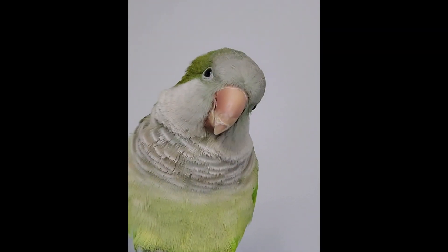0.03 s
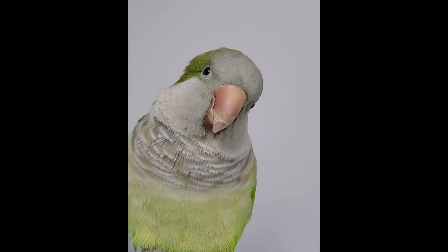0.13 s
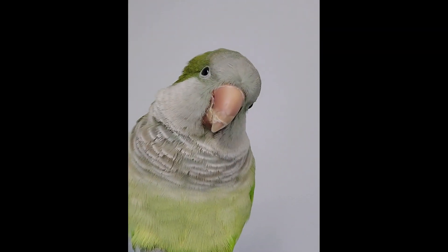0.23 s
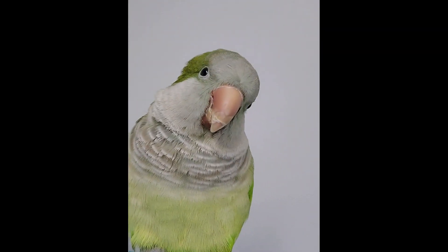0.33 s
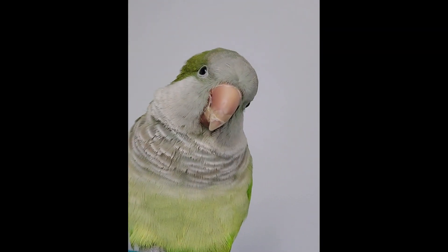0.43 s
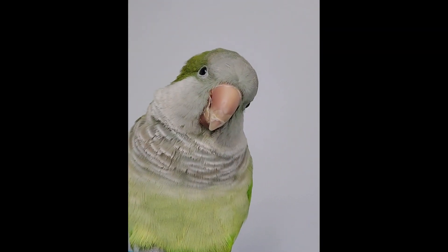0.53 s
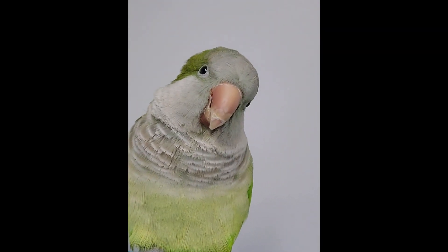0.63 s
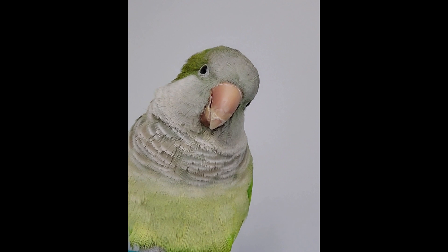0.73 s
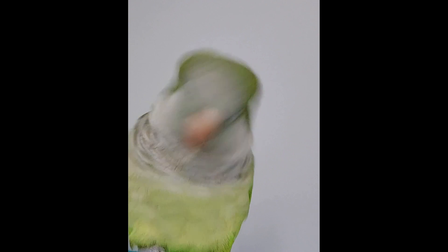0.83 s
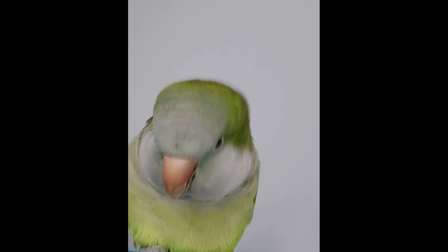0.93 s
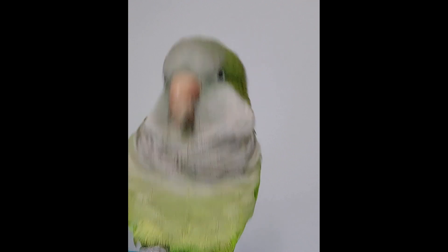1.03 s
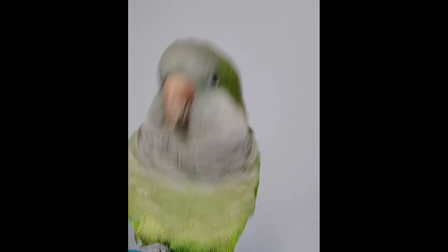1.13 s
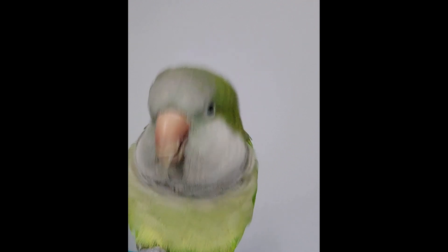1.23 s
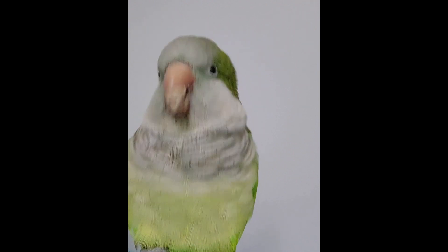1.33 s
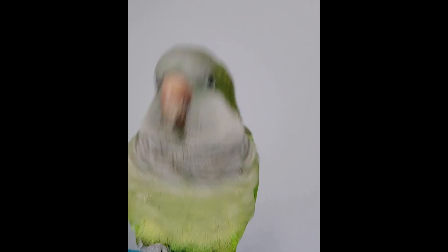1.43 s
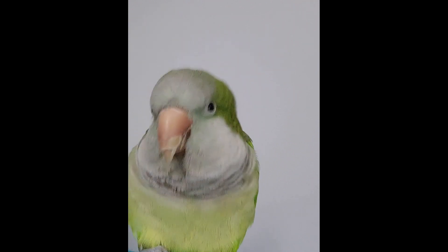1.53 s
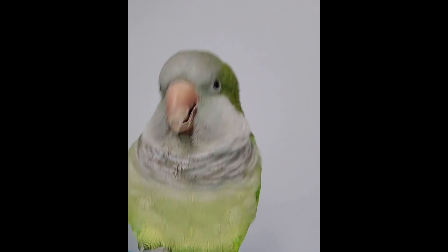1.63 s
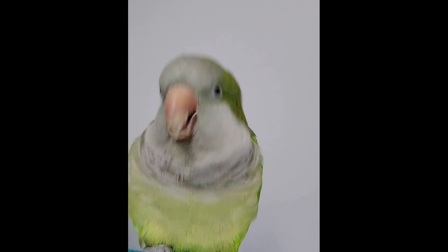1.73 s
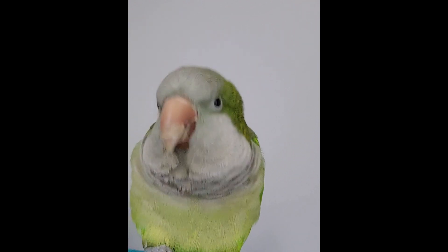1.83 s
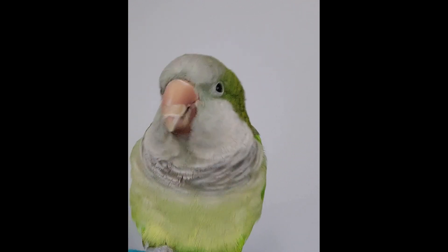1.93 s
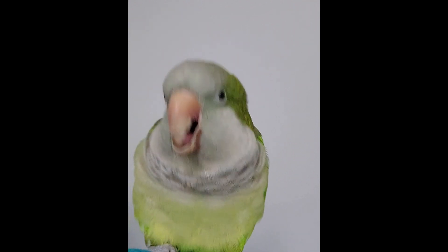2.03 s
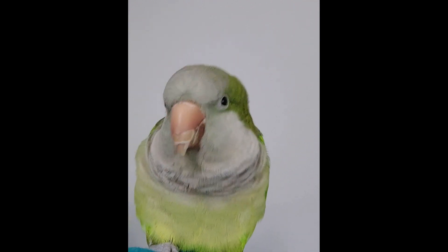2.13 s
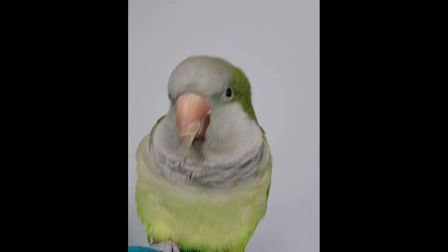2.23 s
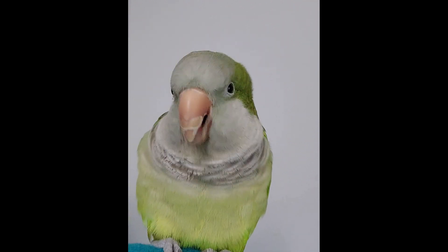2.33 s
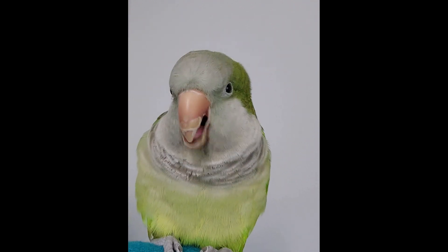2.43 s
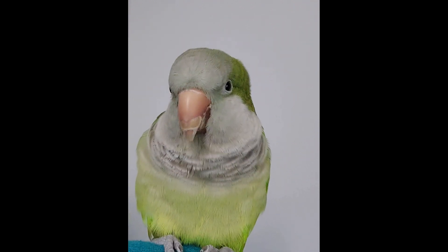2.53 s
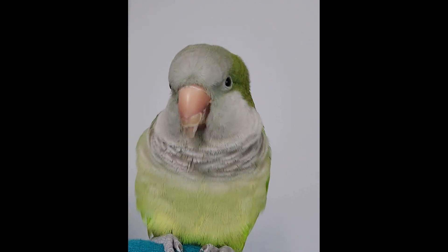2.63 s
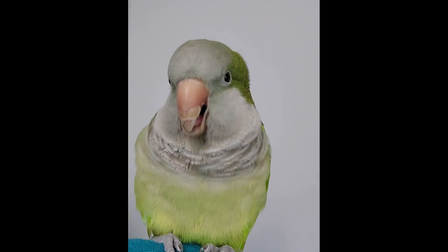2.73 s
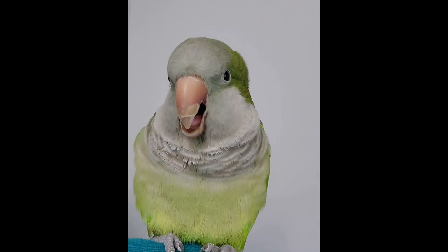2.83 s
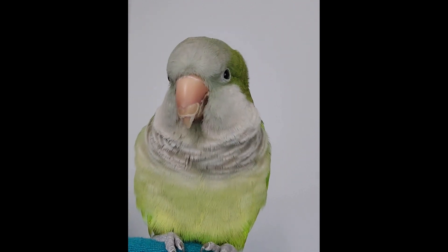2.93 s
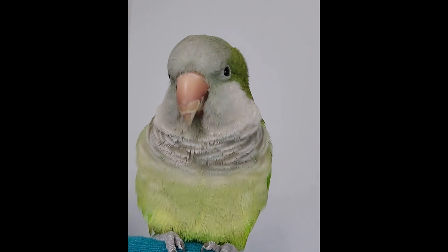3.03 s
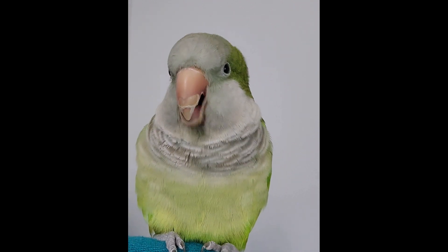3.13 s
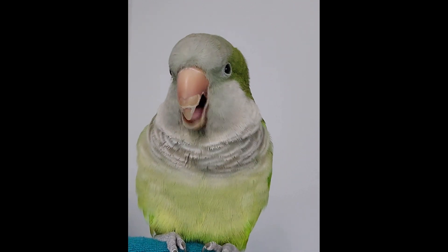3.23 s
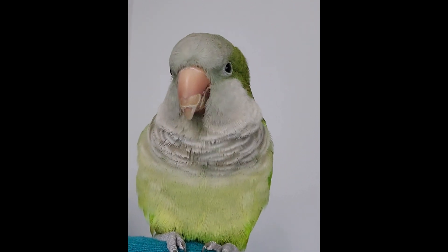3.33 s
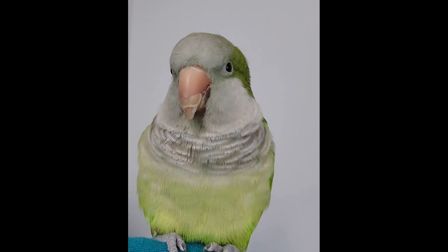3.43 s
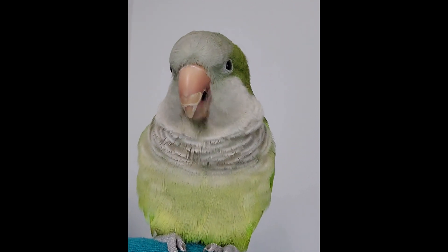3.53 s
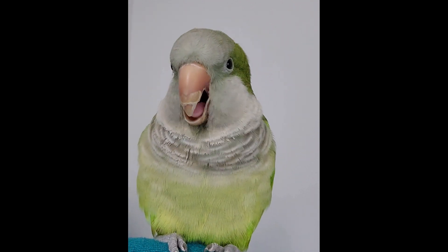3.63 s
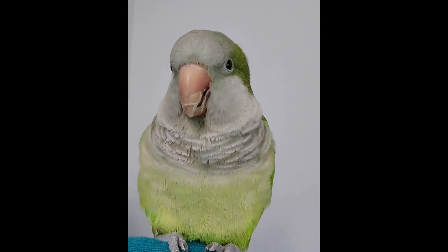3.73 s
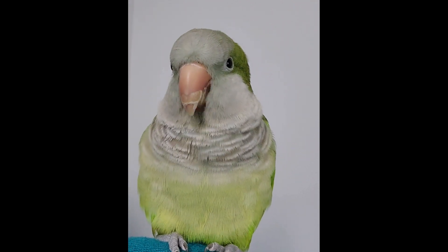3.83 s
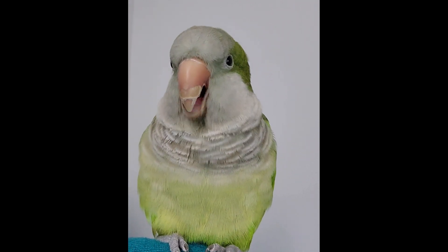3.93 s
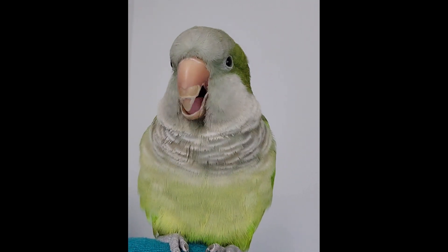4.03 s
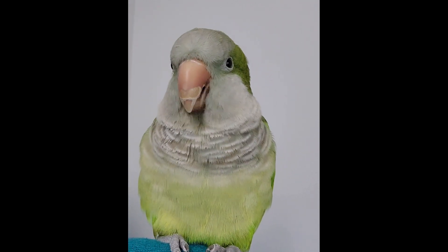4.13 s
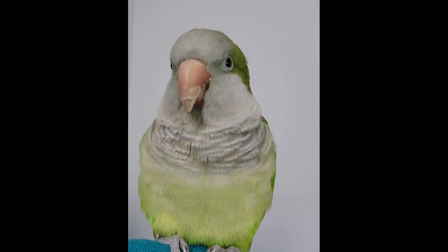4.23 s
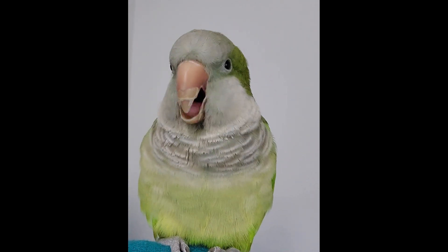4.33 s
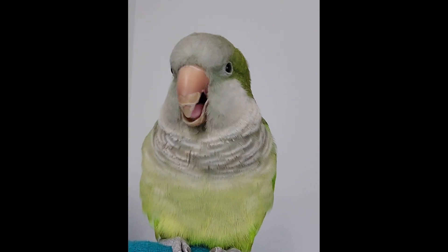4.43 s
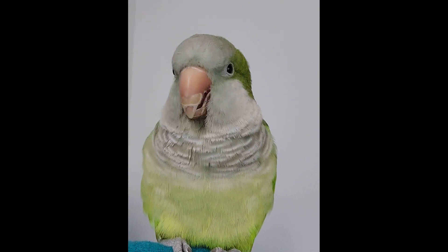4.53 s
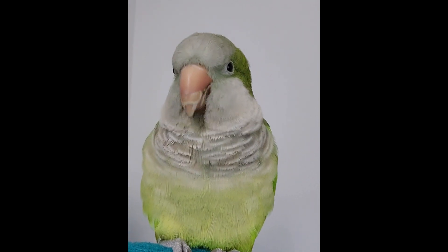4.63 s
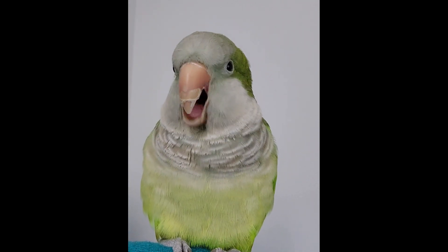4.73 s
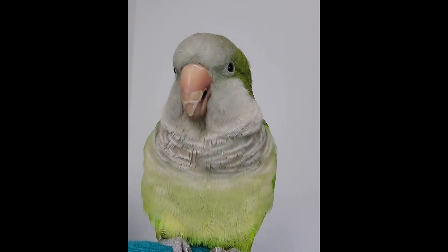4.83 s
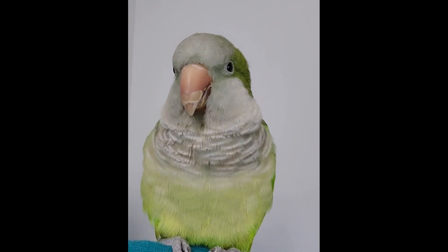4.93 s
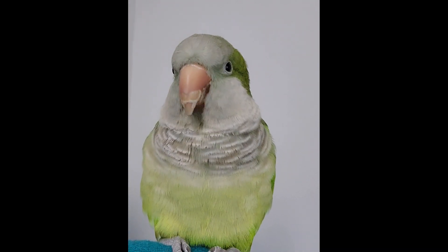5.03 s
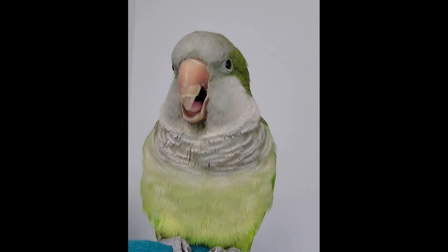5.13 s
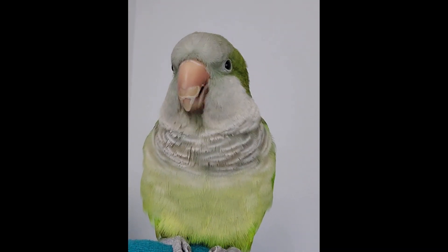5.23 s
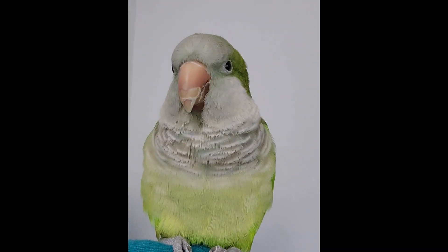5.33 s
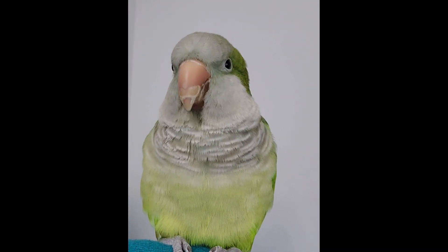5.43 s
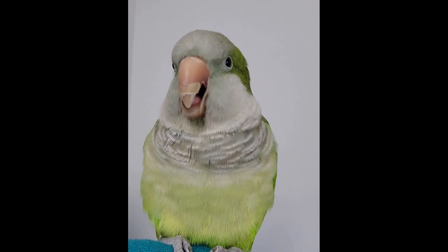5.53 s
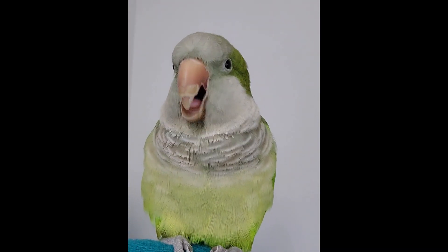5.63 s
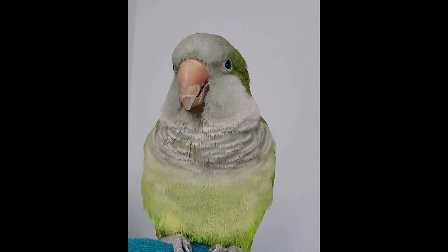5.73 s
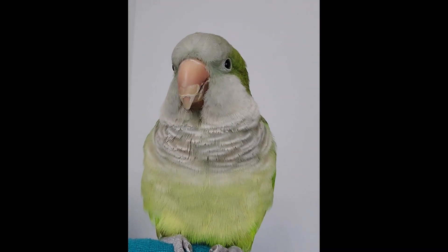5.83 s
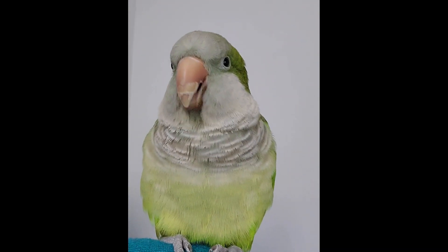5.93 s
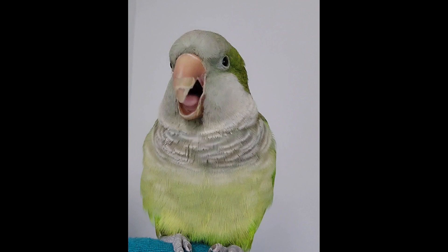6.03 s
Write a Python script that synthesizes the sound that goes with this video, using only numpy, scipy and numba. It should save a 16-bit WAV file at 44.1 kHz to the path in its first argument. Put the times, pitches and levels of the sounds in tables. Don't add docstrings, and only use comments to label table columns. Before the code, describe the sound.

From 0 to 1 second there is only faint hiss with a little low rumble and an extremely weak high appliance whine in a quiet furnished room. At about 1.0 two tiny dry beak ticks lead straight into the first short squawk of a small parrot, an arm's length from a phone. Further squawks follow at about 1.3, 1.6, 1.95, 2.3, 2.7, 3.1, 3.5, 3.9, 4.3, 4.65, 5.1, 5.5 and 5.9, fourteen in all. Each lasts around a fifth of a second, arching up in pitch and sliding down, buzzy, nasal and piercing, with a sizzling treble edge. The early ones are pinched and slightly creaky; later ones open wider, with rougher, weakening tails. Soft dull air thumps brush the microphones, mostly on the right, notably near 2.4 and 3.6. Reverberation is short, and the hiss sinks under the calls.

```python
import sys
import numpy as np
from scipy import signal
from scipy.fft import rfft, irfft, next_fast_len
from scipy.io import wavfile
from scipy.ndimage import uniform_filter1d, map_coordinates
from numba import njit

SR = 44100
rng = np.random.default_rng(int(sys.argv[2]) if len(sys.argv) > 2 else 0)


def generate_wav(sig):
    pcm = np.round(np.clip(np.atleast_2d(sig).T, -1, 1) * 32767).astype(np.int16)
    wavfile.write(sys.argv[1], SR, pcm)


def nominal_scale(level):
    x = np.asarray(level, float) / 20
    return 10 ** x


N = 268921
TIME = np.arange(N) / SR


def level(x, db):
    return x * nominal_scale(db) / np.sqrt(np.mean(x ** 2))


def curves(table):
    s, *columns = np.transpose(table)
    return [np.interp(TIME, s, c) for c in columns]


@njit
def svf(x, hz, width_hz):
    y, b, l = np.empty(len(x)), 0., 0.
    for i in range(len(x)):
        g, k = np.tan(np.pi * hz[i] / SR), width_hz / hz[i]
        v = (b + g * (x[i] - l)) / (1 + g * (g + k))
        b, l, y[i] = 2 * v - b, l + 2 * g * v, k * v
    return y


def band(x, hz, width_hz):
    if np.ndim(hz):
        return svf(x, np.clip(hz, 20, .45 * SR), 1. * width_hz)
    return signal.lfilter(*signal.iirpeak(hz, hz / width_hz, fs=SR), x)


def walk(rate_hz):
    k = int(SR / rate_hz)
    held = np.repeat(rng.standard_normal(N // k + 1), k)
    return 1.3 * uniform_filter1d(uniform_filter1d(held, k), k)[:N]


def late(x, samples):
    return np.concatenate([np.zeros(int(samples)), x])[:N]


# freq_hz, density_db_per_hz
HISS_SPECTRUM = [(25, -10), (60, -2.5), (110, -16.5), (170, -25), (330, -12.5), (700, -27), (2000, -21),
                 (3500, -36), (6000, -37), (7500, -46.5), (12000, -65.5)]
# freq_hz, level_db
WHINE_TONES = [(4204, -88.5), (4414, -97.5)]


def hiss(duck):
    hiss_db = -68
    out = 0
    freq_hz, density_db = np.transpose(HISS_SPECTRUM)
    port_tilt = nominal_scale(np.array([[-1.0], [1.0]]))
    for hz in 28 * 2 ** np.arange(0, 9, .5):
        mid, side = (band(rng.standard_normal(N), hz, hz / 3) for _ in range(2))
        db = np.interp(np.log(hz), np.log(freq_hz), density_db) + walk(6)
        apart = np.clip(hz / 2000, .15, 1)
        depth_db = np.interp(np.log(hz), np.log([80, 300, 2000]), [-3, -8, -12])
        pair = mid + apart * side * np.array([[1], [-1]])
        out = out + nominal_scale(db + depth_db * duck) * pair * port_tilt
    quiet = np.sqrt(np.mean(out[:, :SR * 9 // 10] ** 2))
    whine = sum(nominal_scale(db - 8 * duck) * np.sqrt(2) * np.sin(2 * np.pi * hz * TIME) for hz, db in WHINE_TONES)
    return out * nominal_scale(hiss_db) / quiet + whine * np.array([[1], [.6]])


def gain_duck(bird):
    recovery_s = 1.5
    keep = np.exp(-1 / (SR * recovery_s))
    loud = uniform_filter1d(np.abs(bird), size=900) > nominal_scale(-40)
    return np.tanh(1.8 * signal.lfilter([1 - keep], [1, -keep], 1. * loud))


# time_s, level_db, left_minus_right_db
AIR_PUFFS = [
    (1.45, -76, -14),
    (2.391, -64.5, -15.5),
    (2.75, -68, -5.5),
    (3.63, -61.5, -9),
    (4.352, -67, -11.5),
    (5.58, -65, -10),
]


def puffs():
    out = np.zeros((2, N))
    for s, db, pan_db in AIR_PUFFS:
        for side, sign in enumerate([1, -1]):
            thump = level(band(rng.standard_normal(N), 35, 90), db + sign * pan_db / 2)
            out[side] += thump * np.exp(-((TIME - s) / 0.026) ** 2)
    return out


@njit
def walls(x, lags, gain, damp):
    line, soft, out = np.zeros((8, 4096)), np.zeros(8), np.zeros((2, len(x)))
    for i in range(len(x)):
        total = 0.
        for k in range(8):
            soft[k] += (1 - damp) * (gain[k] * line[k, (i - lags[k]) & 4095] - soft[k])
            total += soft[k]
            out[k % 2, i] += soft[k]
        for k in range(8):
            line[k, i & 4095] = x[i] + soft[k] - total / 4
    return out


def room(bird):
    t60_s, damp, room_db = 0.25, 0.19, -22
    lags = rng.integers(500, 2200, size=8)
    return nominal_scale(room_db) * walls(bird, lags, nominal_scale(-60 * lags / SR / t60_s), damp)


# time_s, throat_boost_db, chest_boost_db, right_lag_samples
POSTURE = [(1.1, 5.5, 2.5, 11.5), (1.4, 5, 0.5, 11.3), (1.72, 5.5, 4, 10.75), (2.05, 12, 3.5, 10.34),
           (2.4, 4, 1, 10.4), (2.8, 5, 0, 10.6), (3.2, 5, 3, 11), (4.0, 3.5, -0.5, 10.9),
           (4.8, 4.5, -.5, 10.78), (5.6, 7, 0, 11.1), (6.0, 7, -0.5, 11.2)]
# freq_hz, width_hz, share_removed_0_1
CAVITY_DIPS = [(2890, 100, 0.07), (7630, 240, 0.4)]
# delay_ms, level_db
PERCH_ECHOES = [(.45, -18.5), (1.1, -14.5)]
# freq_hz, left_minus_right_db, right_extra_lag_samples
PORT_COLOUR = [(350, 1, 4), (650, 6, 2.5), (1200, 3.5, -2.5), (1750, 0, -.4), (2300, -.5, .2),
               (3000, 4, .4), (4000, 3, -.2), (5800, -5, -.1), (6900, 1, 1.1), (7800, 11, .6),
               (9300, 15, -.2), (11400, 5, -.1), (12600, -4, .1)]
# delay_ms, level_db
SURFACE_ECHOES = [
    [(2.3, -8.5), (3.7, -10), (7.1, -11.5), (11.9, -18)],
    [(2.9, -26.5), (4.3, -9), (6.4, -6), (13.1, -19)],
]


def ports(x):
    for hz, width_hz, share in CAVITY_DIPS:
        x = x - share * band(x, hz, width_hz)
    x = x + sum(nominal_scale(db) * late(x, ms * SR / 1000) for ms, db in PERCH_ECHOES)
    size = next_fast_len(N)
    hz, db, lag = np.transpose(PORT_COLOUR)
    bins = np.arange(size // 2 + 1)
    tilt_db, extra = (np.interp(np.log(bins * SR / size + 1), np.log(hz), c) for c in (db, lag))
    half = nominal_scale(tilt_db / 2) * np.exp(1j * np.pi * bins * extra / size)
    left, right = (irfft(rfft(x, size) * half ** sign, size)[:N] for sign in (1, -1))
    right = map_coordinates(right, [np.arange(N) - curves(POSTURE)[2]], order=3)
    heard = []
    for port, echoes in zip((left, right), SURFACE_ECHOES):
        treble = band(band(port, 6500, 9900), 6000, 11000)
        heard.append(port + sum(nominal_scale(db) * late(treble, ms * SR / 1000) for ms, db in echoes))
    return np.array(heard)


# time_s, peak_db, freq_hz
BEAK_TICKS = [
    (1.002, -45, 6020),
    (1.015, -36.5, 4500),
]


def ticks():
    out = np.zeros(N)
    for s, db, hz in BEAK_TICKS:
        after = np.maximum(TIME - s, 0)
        out += level(band(rng.standard_normal(N), hz, 7000), db) * (TIME > s) * np.exp(-after / .0025)
    return out


# start_s, effort_db, attack_s, hold_end_after_start_s, fade_s
CALLS = [(1.025, -21, .003, 0.058, 0.054), (1.303, -22, 0.0076, 0.093, .075),
         (1.635, -20, 0.0054, .1, 0.064), (1.944, -21, .011, 0.12, 0.089), (2.312, -18, .012, 0.064, .18),
         (2.712, -18, 0.012, 0.088, 0.13), (3.108, -18.5, 0.016, .11, 0.13),
         (3.524, -19.5, 0.016, 0.12, 0.083), (3.902, -20.5, .017, .11, .095),
         (4.265, -18, .017, 0.068, 0.14), (4.655, -18.5, 0.029, 0.086, 0.15),
         (5.082, -20.5, 0.018, 0.12, 0.076), (5.49, -17.5, .02, 0.084, 0.12),
         (5.916, -20.5, 0.036, .11, .075)]
# scoop_hz, crest_hz, end_hz, crest_after_start_s, fall_s
CALL_TUNES = [(540, 708, 420, .078, .064), (428.3, 606, 265, .09, .1), (638.4, 735, 340, .075, .082),
              (589.3, 703, 267, .09, .098), (573.5, 624, 310, .062, .125), (577, 578, 295, 0.055, .125),
              (559.5, 622, 390, .112, .075), (504.3, 610, 320, .108, .072), (561.6, 622, 560, .09, 0.054),
              (579.5, 700, 287, 0.085, .09), (597, 711, 260, .131, .085), (589, 692, 303, .132, .045),
              (622, 695, 285, .075, .105), (503, 566, 230, .09, .08)]
# first_hz, rise_bend, fall_bend (1 straight, more = late), low_tail_s
CALL_MANNER = [(589.7, .8, 3.2, .004), (503.5, .9, 1.5, 0.025), (487.4, .6, 2.1, .018),
               (474, 0.71, 1.7, 0.024), (447.5, 0.96, 1.4, 0.055), (438, .9, 1.6, 0.045),
               (401.6, .9, 1.05, .035), (394, 1.05, 1.4, 0.046), (471.6, .6, 1.1, 0.027),
               (445.4, 1.05, 1.2, 0.046), (603, 0.88, .5, .02), (487, 1.6, 1.8, 0.035),
               (459, 0.65, 1.8, 0.032), (470, 0.77, 1.9, .016)]
# time_s, pitch_jump_hz, half_width_s
VOICE_CATCHES = [(1.049, -70, .01), (1.647, -60.5, .01), (1.742, 22, 0.013), (2.486, -49, .012),
                 (2.511, 45, .015), (2.752, 23.5, .01), (3.625, 100, .024), (4.667, -40, .006),
                 (4.682, 55, .007), (5.124, 30, .012), (5.937, -90, .012)]


def gestures():
    scoop_s, tail_sag = .036, .15
    attack_db, fade_db, fade_bend = -28, -29.5, 1.463
    swell_db_per_octave, chest_db_per_octave = 2.5, 4.5
    chest_db, chest_follows = -34.5, 0.071
    chest_late_db, chest_late_s, chest_end_db, chest_end_s = -10.5, .014, -12, 0.048

    which = np.clip(np.searchsorted(np.array(CALLS)[:, 0], TIME + .03) - 1, 0, None)
    start, top_db, attack, hold, fade = np.array(CALLS)[which].T
    scoop_hz, crest_hz, end_hz, crest, fall = np.array(CALL_TUNES)[which].T
    first_hz, rise_bend, fall_bend, tail = np.array(CALL_MANNER)[which].T
    t = np.maximum(TIME - start, 0)
    length = crest + fall + tail

    def part(a, b):
        return np.clip((t - a) / (b - a), 0, 1)

    hz = first_hz + (scoop_hz - first_hz) * part(0, scoop_s)
    hz = hz + (crest_hz - scoop_hz) * part(scoop_s, crest) ** rise_bend
    hz = hz + (end_hz - crest_hz) * part(crest, crest + fall) ** fall_bend
    hz = hz * (1 - tail_sag * part(crest + fall, length))
    hz = hz + sum(jump_hz * np.exp(-((TIME - s) / width_s) ** 4) for s, jump_hz, width_s in VOICE_CATCHES)
    slack = np.log2(hz / crest_hz)
    effort_db = top_db + attack_db * np.exp(-t / attack)
    effort_db = effort_db + fade_db * (np.maximum(t - hold, 0) / fade) ** fade_bend
    effort_db = np.maximum(effort_db + swell_db_per_octave * slack, -70)
    body_db = chest_db + chest_db_per_octave * slack + chest_follows * (effort_db - top_db)
    body_db = body_db + chest_late_db * np.exp(-t / chest_late_s)
    body_db = body_db + chest_end_db * part(length - chest_end_s, length)
    return hz, effort_db, body_db, t, part(hold, length), (TIME > start) & (t < length)


def syrinx(hz, rough):
    phase = np.cumsum(hz * (1 + .0015 * walk(70) + .005 * walk(35))) / SR
    cycle = np.arange(1, int(phase[-1]))
    chance = rng.standard_normal((N // 40, 2))[:len(cycle)].T
    at = np.interp(cycle, phase, np.arange(N))
    r, rate = np.interp(at, np.arange(N), rough), np.interp(at, np.arange(N), hz)
    trains = []
    for share in (1, .6):
        when = at + .12 * share * r * chance[0] * SR / rate
        size = nominal_scale(7.0 * share * r * chance[1]) * np.sqrt(SR / rate)
        taps = np.clip(when.astype(int)[:, None] + np.arange(-7, 9), 0, N - 1)
        gap = taps - when[:, None]
        click = np.sinc(gap) * np.cos(np.pi * gap / 16) ** 2 * size[:, None]
        trains.append(np.bincount(taps.ravel(), click.ravel(), N))
    air = np.exp(-(phase % 1) / .5) * rng.standard_normal(N)
    return *trains, air


def ring(x, modes, opening):
    out = 0
    for k, (shut_hz, open_hz, width_hz, shut_db, open_db) in enumerate(modes):
        gain = (-1) ** k * nominal_scale(shut_db + (open_db - shut_db) * opening)
        out = out + gain * band(x, shut_hz + (open_hz - shut_hz) * opening, width_hz)
    return level(out, 0)


# ratio, width_hz, level_db
TONGUE_MODES = [(.87, 1072, -5.5), (1.0, 1042, 1), (1.1, 900, -1.5)]
# freq_hz, width_hz, level_db
BEAK_EDGE = (14900, 1100, 0.5)


def tongue_ring(thin, tongue_hz, effort_db, t, opening):
    edge_late_db, edge_late_s = -22, .02
    nasal_hz, nasal_glide_hz, nasal_width_hz, nasal_share = 12400, 950, 1300, 0.94
    out = sum((-1) ** k * nominal_scale(db) * band(thin, ratio * tongue_hz, width_hz)
              for k, (ratio, width_hz, db) in enumerate(TONGUE_MODES))
    edge_hz, edge_width_hz, edge_db = BEAK_EDGE
    edge_db = edge_db + 0.27 * np.minimum(effort_db + 26.5, 0) + edge_late_db * np.exp(-t / edge_late_s)
    out = out - band(band(thin, edge_hz, edge_width_hz), edge_hz, 2500) * nominal_scale(edge_db)
    cavity_hz = nasal_hz + nasal_glide_hz * np.clip(opening, 0, 1)
    return level(out - nasal_share * band(out, cavity_hz, nasal_width_hz), 0)


# time_s, gape_0_1, tongue_hz, rasp_db, tongue_db
MOUTH_SHAPE = [(1.1, 0.06, 10400, -3, -13.5), (1.4, 0.1, 10220, -2, -7.5), (1.72, 0.7, 10400, -4, -6),
               (2.05, 1.02, 10440, -5.5, -6.5), (2.4, 0.8, 10250, -6.5, -8.5),
               (2.8, 1.07, 11010, -5.5, -7.5), (3.2, 0.99, 11150, -7.5, -10),
               (3.6, 1.05, 11350, -5.5, -5.5), (4.0, 0.9, 11240, -6.5, -7), (4.8, 1.01, 11040, -6, -8.5),
               (5.2, 1.04, 11140, -7, -7), (6.0, 1.01, 11070, -8, -10)]
# time_s, roughness_0_1
CREAK = [(1.0, 0), (1.04, 0.2), (1.06, 0), (1.29, 0), (1.3, 0.2), (1.34, 0.06), (1.37, 0.01), (3.5, .02),
         (3.55, .08), (3.6, 0), (4.65, .07), (4.7, 0.04), (6, .02)]
# shut_hz, open_hz, width_hz, shut_db, open_db
CHEST_MODES = [(334, 342, 59, -5, 1.5), (1220, 1610, 552, 9, 6.5), (1620, 1600, 490, 6, 2)]
BEAK_MODES = [(3302, 3150, 144, 11, 5), (3480, 4093, 305, 1, 2.5), (4070, 5000, 600, -0.5, -6.5)]
RASP_MODES = [(5050, 5710, 320, 8, 6.5), (6050, 6830, 780, 5.5, 0.5), (7340, 7570, 800, -5.5, -2)]
# shut_hz, open_hz, width_hz, shut_db, open_db
THROAT_MODE = (2050, 2499.5, 419, 3.5, -9)


def parrot():
    open_s, shut_share = 0.073, 0.067
    tongue_rest_hz, tongue_s, tongue_late_db, tongue_late_s = 9190, .075, -21.5, 0.012
    hz, effort_db, body_db, t, closing, sounding = gestures()
    hz = uniform_filter1d(hz, size=280)
    throat_boost_db, chest_boost_db, _ = curves(POSTURE)
    gape, reach_hz, rasp_db, tongue_db = curves(MOUTH_SHAPE)
    opening = gape * np.clip(t / open_s, 0, 1) - shut_share * closing
    reach = np.clip(t / tongue_s, 0, 1) - 1.1 * closing ** 2
    tongue_hz = tongue_rest_hz + (reach_hz - tongue_rest_hz) * reach
    weak_db = np.minimum(effort_db + 36, 0)
    chest_db = body_db + chest_boost_db - effort_db
    rasp_db = rasp_db + weak_db
    tongue_db = tongue_db + weak_db + tongue_late_db * np.exp(-t / tongue_late_s)
    rough = 0.0088 + 0.24 * np.clip(-(effort_db + 20.5) / 22, 0, 1) + curves(CREAK)[0]
    pulses, body, air = syrinx(hz, rough)
    breathy = pulses + (.07 + .7 * rough) * air

    chest = ring(body - band(body, 60, 320) + 0.035 * air, CHEST_MODES, opening) * nominal_scale(chest_db)
    throat = ring(band(breathy, 2200, 1200), [THROAT_MODE], opening) * nominal_scale(throat_boost_db - 6.5)
    beak = ring(band(band(breathy, 3900, 3700), 3900, 4400), BEAK_MODES, opening)
    rasp = ring(band(breathy, 7100, 2300), RASP_MODES, opening) * nominal_scale(rasp_db)
    thin = band(breathy + .05 * air, 12000, 9000)
    tongue = tongue_ring(thin, tongue_hz, effort_db, t, opening) * nominal_scale(tongue_db)
    breath = nominal_scale(effort_db + 2.5) * uniform_filter1d(1. * sounding, size=200)
    return breath * (tongue + late(rasp, 8) + late(beak, 18) - late(throat, 26) + late(chest, 30))


def scene():
    bird = parrot() + ticks()
    return ports(bird) + room(bird) + hiss(gain_duck(bird)) + puffs()


def top_cut(x):
    return signal.sosfilt(signal.butter(12, 17000, fs=SR, output="sos"), x)


def record(dry):
    ceiling = .9
    cut = signal.ellip(10, .2, 60, 15720, fs=SR, output="sos")
    mix = signal.sosfilt(cut, ceiling * np.tanh(dry / ceiling))
    return top_cut(mix)


dry = scene()
out = record(dry)
generate_wav(out)
```